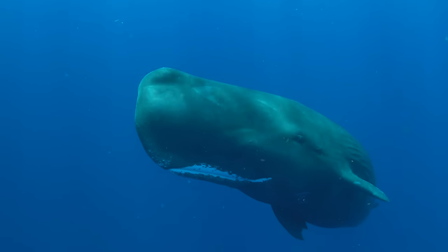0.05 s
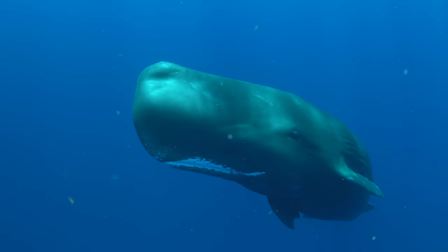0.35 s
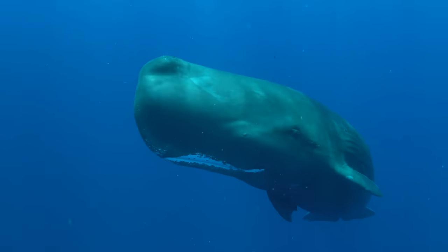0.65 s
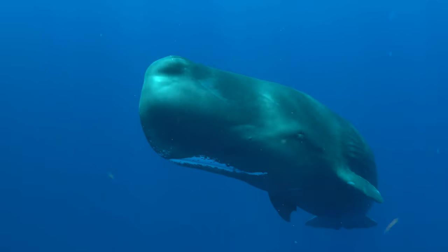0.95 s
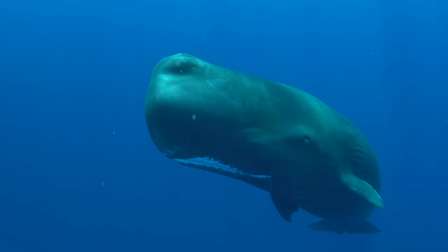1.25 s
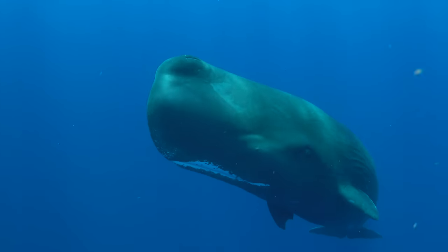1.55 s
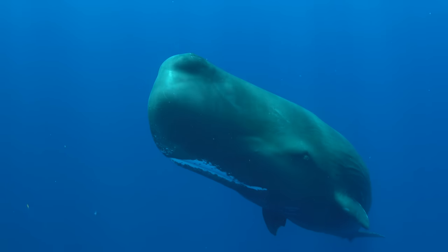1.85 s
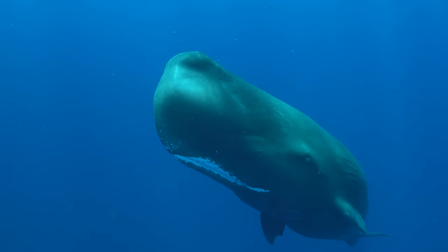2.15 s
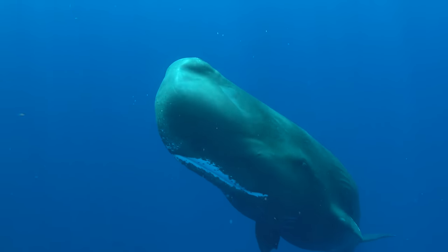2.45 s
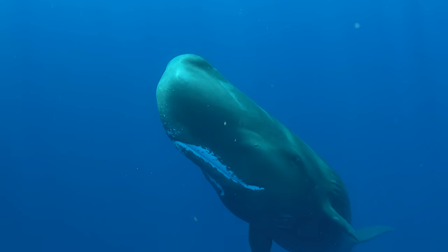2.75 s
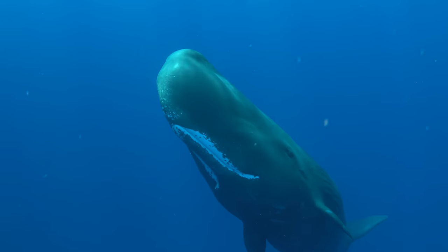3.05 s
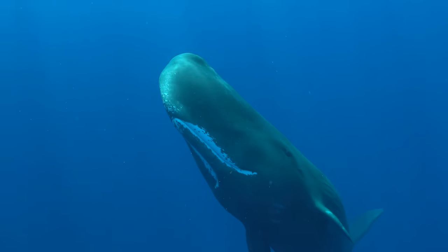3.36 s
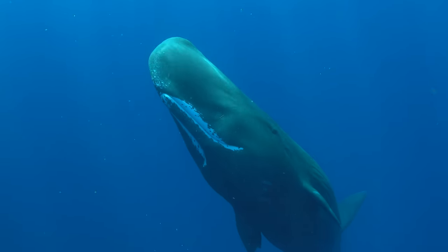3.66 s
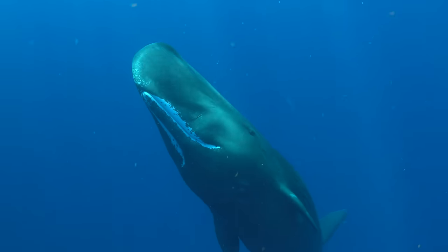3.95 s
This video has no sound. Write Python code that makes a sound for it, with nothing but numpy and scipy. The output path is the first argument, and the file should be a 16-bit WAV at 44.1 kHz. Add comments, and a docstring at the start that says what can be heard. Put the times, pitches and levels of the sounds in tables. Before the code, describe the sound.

A sperm whale clicks close by underwater, the clicks speeding up into a creak.

```python
"""A soft wash of water with a faint crackle, and at once a sperm whale clicking close by:
a loose train, a pause, then clicks that speed up into a creak. Each click is a dull first pulse,
a brighter one from the head just after it, and a low knock that sets the camera housing ringing.
Small pockets of air gurgle, a few hard snaps sound, and near the end something bumps the housing."""
import sys
import numpy as np
from scipy import signal
from scipy.fft import rfft, irfft
from scipy.io import wavfile
from scipy.ndimage import uniform_filter1d, map_coordinates

SR = 44100
rng = np.random.default_rng(int(sys.argv[2]) if len(sys.argv) > 2 else 0)


def put_to_file(sound):
    """Save the sound as 16-bit audio at rate SR, in the file named by the first command-line argument."""
    columns = np.atleast_2d(sound).T  # one column per channel
    safe = np.clip(columns, -1, 1)
    whole_steps = np.round(safe * 32767)
    wavfile.write(sys.argv[1], SR, whole_steps.astype(np.int16))


N = 176400
TIME_S, BINS_HZ = np.arange(N) / SR, np.fft.rfftfreq(N, 1 / SR)
EVENT_N = 4096
AGE_S = np.arange(EVENT_N) / SR


def from_db(db):
    """Decibels to gain."""
    return 10 ** (np.asarray(db) / 20)


def unit_rms(x):
    """Scale to rms 1."""
    return x / np.sqrt(np.mean(x ** 2) + 1e-20)


def at_hz(points, hz):
    """Read a table on a log-frequency axis."""
    points_hz, values = np.transpose(points)
    return np.interp(np.log(hz + 1e-9), np.log(points_hz), values)


def add(out, time_s, sound):
    """Mix a sound in at time_s."""
    start = int(time_s * SR)
    out[:, start:start + len(sound.T)] += sound[..., :max(N - start, 0)]


def pan(db):
    """Gains for a left-minus-right level."""
    return from_db(np.array([[db], [-db]]) / 2)


def colour(white, spectrum):
    """Filter by a spectrum table; rms 1."""
    size = white.shape[-1]
    gain = from_db(at_hz(spectrum, np.fft.rfftfreq(size, 1 / SR)))
    return unit_rms(irfft(rfft(white) * gain, size))


def swell(peak_s, attack_s, decay_s, tail_db, tail_s):
    """Pulse envelope: rise, quick fall, tail; energy of 10 ms at rms 1."""
    after_s = np.maximum(AGE_S - peak_s, 0)
    rise = np.exp(np.minimum(AGE_S - peak_s, 0) / attack_s)
    shape = rise * (np.exp(-after_s / decay_s) + from_db(tail_db) * np.exp(-after_s / tail_s))
    return shape / np.sqrt(np.sum(shape ** 2) / (SR / 100))


def pulse(white, spectrum, envelope):
    """Smeared pulse: noise under an envelope, evened out to the given spectrum."""
    target = from_db(at_hz(spectrum, np.fft.rfftfreq(EVENT_N, 1 / SR)))
    grain = colour(white, spectrum)
    power = uniform_filter1d(np.abs(rfft(grain * envelope)) ** 2, size=25)
    even = envelope * irfft(rfft(grain) * target / np.sqrt(np.abs(power) + 1e-12))
    return unit_rms(even) * np.sqrt(np.mean(envelope ** 2))


def varied(modes, scatter_db, detune=0):
    """The modes as one blow excites them, each a little different."""
    return [(hz * (1 + detune * rng.normal()), db + scatter_db * rng.normal(), t60_s)
            for hz, db, t60_s in modes]


def ring(modes, delay_s, attack_s):
    """Struck modes build up and die away."""
    t = np.maximum(AGE_S - delay_s, 0)
    rings = sum(from_db(db) * np.exp(-np.log(1000) * t / t60_s) * np.sin(2 * np.pi * hz * t)
                for hz, db, t60_s in modes)
    return rings * (1 - np.exp(-t / attack_s))


def burst(t, hz, width_s, rise_per_s=0):
    """A tone under a bell curve centred on t = 0."""
    bell = np.exp(-(t / width_s) ** 2 / 2)
    return bell * np.cos(2 * np.pi * hz * t * (1 + rise_per_s * t / 2))


# Likeness of the two sides in the wash: (frequency [Hz], correlation [-])
WASH_CORRELATION = [(100, 0.78), (350, 0.99), (700, 0.59), (1100, 0.7), (2500, 0.022), (8000, 0.43)]
def stereo_noise(gain):
    """Noise with a gain per frequency, most alike left and right in the lows; rms 1."""
    alike = at_hz(WASH_CORRELATION, BINS_HZ)
    mid, side = rfft(rng.standard_normal((2, N))) * gain
    return unit_rms(irfft(np.sqrt(1 + alike) * mid + np.sqrt(1 - alike) * side * [[1], [-1]], N))


# Wash spectrum: (frequency [Hz], relative density [dB])
WASH_SPECTRUM = [(25, -61), (70, -31), (130, -21.5), (220, -14.5), (330, -8), (520, -8), (660, -7),
                 (830, -7.5), (1200, -8.5), (1500, -14.5), (2400, -14.5), (5500, -18.5), (9000, -19.5),
                 (13000, -21.5), (16000, -27)]
# Housing resonances in the wash: (centre [Hz], half-width [Hz], level [dB])
HUM_BANDS = [(433, 20.5, -68), (1032.5, 34, -60.5), (1127, 17.4, -67)]
def water(wash_db=-60, swell_db=1):
    """A soft wash swells a little and hums in the housing's resonances."""
    wash = from_db(wash_db) * stereo_noise(from_db(at_hz(WASH_SPECTRUM, BINS_HZ)))
    hum = sum(from_db(db) * stereo_noise(1 / (1 + ((BINS_HZ - centre_hz) / width_hz) ** 2))
              for centre_hz, width_hz, db in HUM_BANDS)
    drift = colour(rng.standard_normal(N), [(4, -50), (15, -19.5), (100, -65), (400, -120)])
    return (wash + hum) * from_db(swell_db * drift)


# Crackle filter: (frequency [Hz], relative gain [dB])
CRACKLE_SPECTRUM = [(500, -23), (3000, 9), (7000, -7), (12000, 0), (16000, -8)]
def crackle(level_db=-75, ticks_per_s=120, spread_db=4):
    """Tiny ticks all around in the water, each side hearing its own."""
    sizes = from_db(spread_db * np.minimum(rng.exponential(1, (2, N)), 3))
    signs = rng.choice([-1, 1], (2, N))
    ticks = sizes * signs * (rng.random((2, N)) < ticks_per_s / SR)
    smear = rng.standard_normal((2, EVENT_N)) * np.exp(-AGE_S / 0.00071)
    smeared = signal.fftconvolve(ticks, smear, axes=1)[:, :N]
    return from_db(level_db) * colour(smeared, CRACKLE_SPECTRUM)


# Clicks before the creak: (time [s], relative crack level [dB], relative knock level [dB])
SINGLE_CLICKS = [(.0439, -41.7, -55), (.1023, -41.7, -56), (.17, -41, -57), (.2344, -40, -56),
                 (.2961, -39, -56), (.3595, -40, -57), (.3817, -44.6, -64), (.4231, -40, -55),
                 (.4909, -41, -55), (.5585, -43, -56), (.6201, -40, -55), (.6737, -40, -55),
                 (.7226, -39.4, -53), (.7681, -38.7, -53), (.7926, -41, -64), (.8139, -40, -51),
                 (.873, -38.7, -48.5), (.9479, -39, -47), (1.1049, -42, -45.5), (1.4265, -38, -44),
                 (1.593, -38, -45), (1.7226, -37, -44.4), (1.8574, -35.5, -45), (1.9701, -35, -45.6),
                 (2.0543, -37.4, -46), (2.1351, -36, -46), (2.1971, -37.5, -46), (2.2499, -38, -46.6),
                 (2.3082, -38.6, -47), (2.358, -38.7, -47), (2.4101, -39.6, -47), (2.4579, -39.7, -47),
                 (2.5055, -39, -47), (2.5513, -39, -48), (2.5941, -38.5, -49)]
# Every fourth creak click: (time [s], relative crack level [dB], relative knock level [dB])
CREAK_CLICKS = [(2.6351, -37.3, -49), (2.7929, -41.5, -51), (2.9289, -38, -52.6), (3.051, -38, -53),
                (3.1652, -41.7, -54.4), (3.271, -44, -56), (3.3727, -44.7, -58), (3.4723, -46.7, -57),
                (3.5661, -46, -56), (3.6553, -44.6, -57), (3.7406, -42.6, -58.2), (3.8237, -42.3, -58.4),
                (3.9049, -42.7, -58.2), (3.9858, -42.3, -58)]
def whale_clicks():
    """The single clicks, then the creak speeding up along a smooth curve."""
    steps = 2 + np.arange(4 * len(CREAK_CLICKS) - 3) / 4
    padded = [np.pad(column, 2, "reflect", reflect_type="odd") for column in np.transpose(CREAK_CLICKS)]
    creak = [map_coordinates(column, [steps]) for column in padded]
    return SINGLE_CLICKS + list(zip(*creak))


# Aim of the head: (time [s], bright over dull [dB], bright peak delay [s], top treble [dB], ping [dB])
HEAD_AIM = [(0, -13, 0.0073, -11, 1.5), (.8, -6, .0054, -6, -3.5), (1.1, -3, .005, 1, 2),
            (1.43, 6, 0.0041, -5, 0.5), (2.0, 1, 0.0054, 3.5, -1.5), (2.5, 2, 0.0045, -1.5, -4.5),
            (3.0, 6, 0.0061, 3.5, -10), (3.3, 0.5, 0.0051, -2, 0), (4, 0.5, 0.0071, -3, -6)]
# First pulse: (frequency [Hz], relative level [dB])
DULL_SPECTRUM = [(100, -75), (1500, -9), (2700, -14), (3500, -8.5), (4400, -5.5), (5400, 1), (6250, 2.5),
                 (6650, 0.5), (7800, -8.5), (10000, -11.5), (12000, -23.5), (16000, -49)]
# Second pulse: (frequency [Hz], relative level [dB])
BRIGHT_SPECTRUM = [(100, -58), (1500, -8), (2800, -11.5), (3700, -4), (4400, -5), (5400, -9), (6200, -3),
                   (7200, 9), (8000, -0.5), (9700, 2.5), (10900, -1), (11800, -1.5), (13500, 1),
                   (16000, -14)]
# Metallic ping of the housing: (frequency [Hz], relative level [dB], t60 [s])
PING_MODES = [(5320, -3, 0.031), (5480, -5.5, .035), (4066, -15.5, 0.059)]
def cracks(gain_db=-6, kept_share=0.93, path_share=0.7, side_spill=0.077):
    """Click treble: two pulses, smeared by paths that drift as the whale turns, and the housing's ping."""
    out = np.zeros((2, N))
    paths = rng.standard_normal((2, 2, EVENT_N))  # pulse, side, sample
    dull_shape = swell(peak_s=0.0019, attack_s=0.001, decay_s=0.0026, tail_db=-24.5, tail_s=0.025)
    aim_times_s, *controls = np.transpose(HEAD_AIM)
    for time_s, db, _ in whale_clicks():
        paths = np.sqrt(kept_share) * paths + np.sqrt(1 - kept_share) * rng.standard_normal(paths.shape)
        grain = np.sqrt(path_share) * paths + np.sqrt(1 - path_share) * rng.standard_normal(paths.shape)
        grain = grain + side_spill * grain[:, ::-1]
        aim_db, peak_s, top_db, ping_db = (np.interp(time_s, aim_times_s, c) for c in controls)
        bright_shape = swell(peak_s, attack_s=0.0019, decay_s=0.0006, tail_db=-8, tail_s=0.0057)
        tilted = [(hz, band_db + np.interp(hz, [9000, 15000], [0, top_db]))
                  for hz, band_db in BRIGHT_SPECTRUM]
        dull = pulse(grain[0], DULL_SPECTRUM, dull_shape) * pan(db=-1)
        bright = pulse(grain[1], tilted, bright_shape) * pan(db=-1.7)
        aim = from_db(aim_db)
        pulses = (dull + aim * bright) / np.hypot(1, aim)
        ping = ring(varied(PING_MODES, scatter_db=2.5), delay_s=0.000813, attack_s=0.0027) * pan(db=5)
        add(out, time_s, from_db(db + gain_db) * (pulses + from_db(ping_db) * ping))
    return out


# Wall resonances: (centre [Hz], width [Hz], gain [dB])
WALL_BANDS = [(3690, 300, 5), (4060, 90, 3.5), (4640, 90, -1), (4850, 48, 7.5), (5330, 125, 5),
              (5430, 220, 4.5), (5840, 71, -0.5), (6400, 140, 5.5), (6450, 100, -1.5), (7160, 400, 4),
              (7670, 140, 0), (8390, 74, 4), (8850, 135, 6), (9530, 200, 5), (9720, 180, 4),
              (10260, 230, 6), (11900, 350, 8.5), (13000, 330, -1), (13600, 130, 5.5)]
def housing_wall(x):
    """Sound crosses the wall: each resonance lifts or dips a narrow band and rings briefly."""
    for hz, width_hz, db in WALL_BANDS:
        band = signal.lfilter(*signal.iirpeak(hz, hz / width_hz, fs=SR), x + 1e-18)
        x = x + (from_db(db) - 1) * band
    return x


# Low housing modes: (frequency [Hz], relative level [dB], t60 [s])
BASS_MODES = [(128, 6, 0.03), (243.6, -1, 0.083), (293.6, 7, 0.066)]
# Midrange housing modes: (frequency [Hz], relative level [dB], t60 [s])
MIDRANGE_MODES = [(477.6, -1.5, 0.052), (570, 8.5, 0.019), (900, 2.5, 0.035), (1047, -5.5, 0.2),
                  (1140, 2, 0.035), (1419, -10, 0.053), (1858, -12, 0.065)]
# Knock colour as the whale turns: (time [s], midrange over bass [dB], centre [Hz])
KNOCK_COLOUR = [(0, 2.5, 1070), (1.0, -2, 995), (1.8, 1, 1110), (2.4, 0, 1160), (2.9, 3.5, 1220),
                (3.2, 1.5, 1025), (3.55, 4.5, 954), (4, 8, 995)]
def knocks(knock_db=10.5, scatter_db=1.4, jitter_s=0.00007, bass_cut_hz=202, leak_db=-23.5):
    """Click lows: a short knock rings the housing, so alike each time that fast clicks fuse to a pitch."""
    out, leak = np.zeros((2, 2, N))
    turn_times_s, mid_db, centre_hz = np.transpose(KNOCK_COLOUR)
    knock_age_s = AGE_S - 0.00262 - np.array([[0.000085], [0]])  # right side leads
    for time_s, _, db in whale_clicks():
        bass_modes = varied(BASS_MODES, scatter_db, detune=0.012)
        mid_modes = varied(MIDRANGE_MODES, scatter_db, detune=0.012)
        bass = ring(bass_modes, delay_s=0.0019, attack_s=0.0011)
        middle = ring(mid_modes, delay_s=0.001907, attack_s=0.00067)
        side = 0.1 * ring(mid_modes, delay_s=0.0023, attack_s=0.0035) * [[1], [-1]]
        knock = burst(knock_age_s, np.interp(time_s, turn_times_s, centre_hz), width_s=0.001)
        mid_gain = from_db(np.interp(time_s, turn_times_s, mid_db))
        midrange = mid_gain * (middle + side + from_db(knock_db) * knock)
        add(out, time_s + jitter_s * rng.normal(), from_db(db) * (bass + midrange))
        add(leak, time_s, from_db(db + leak_db + scatter_db * rng.normal()) * bass)
    highpass = signal.butter(3, bass_cut_hz, "high", fs=SR, output="sos")  # housing passes little bass
    return signal.sosfilt(highpass, out) + leak


# Air pockets: (time [s], level [dB], frequency [Hz], width [s])
AIR_POCKETS = [(0.079, -63.5, 139, 0.006), (.665, -51, 1039, 0.008), (1.531, -50, 1027, 0.005),
               (1.759, -52, 388, 0.0073), (1.801, -51.5, 433, 0.01), (2.009, -48.5, 1090, 0.0088),
               (2.014, -55, 415, 0.01), (2.109, -52, 1010, 0.0075), (2.479, -49, 1020, 0.0039),
               (3.21, -66, 160, 0.0081), (3.579, -54, 183, 0.0038), (3.871, -70, 163, 0.013)]
def gurgles():
    """Small pockets of air wobble, rising very slightly in pitch."""
    return sum(from_db(db) * burst(TIME_S - time_s, hz, width_s, rise_per_s=0.69)
               for time_s, db, hz, width_s in AIR_POCKETS)


# Hard snaps: (time [s], relative level [dB], body peak [Hz])
HARD_SNAPS = [(0.5624, -32.5, 5800), (0.7932, -44, 5300), (3.2932, -43.5, 5560), (3.9692, -40.5, 5230)]
def snaps(gain_db=-6, edge_db=-6.5):
    """Hard, sharp snaps, a ringing body under a bright edge; the loudest accents a click of the train."""
    out = np.zeros((2, N))
    body_shape = swell(peak_s=0.00336, attack_s=0.00098, decay_s=0.0033, tail_db=-10, tail_s=0.0046)
    edge_shape = swell(peak_s=0.0018, attack_s=0.00012, decay_s=0.00061, tail_db=-26, tail_s=0.003)
    edge_spectrum = [(2000, -28), (6000, -11), (11000, -13), (14000, -6)]
    for time_s, db, hz in HARD_SNAPS:
        body_spectrum = [(hz / 60, -40), (hz / 6, -14), (hz * 0.16, -22), (hz * 0.5, -18),
                         (hz * 0.75, -5), (hz * 0.87, -7), (hz, 1), (hz * 1.2, -16), (hz * 2.4, -28)]
        body = pulse(rng.standard_normal((2, EVENT_N)), body_spectrum, body_shape)
        edge = pulse(rng.standard_normal((2, EVENT_N)), edge_spectrum, edge_shape)
        add(out, time_s - 0.003, from_db(db + gain_db) * (body + from_db(edge_db) * edge))
    return out


# Contacts of one bump: (time [s], level [dB], frequency [Hz], width [s])
BUMP_TAPS = [(3.6381, -37.5, 750, 0.00058), (3.6561, -24.5, 1054, 0.0018), (3.6695, -38.5, 1100, 0.0043),
             (3.679, -53, 980, 0.003)]
def bump(scuff_db=-11.5):
    """Something taps the housing: hollow bursts with a little scuff."""
    out = np.zeros((2, N))
    scuff_spectrum = [(90, -45), (600, -4), (1500, -2), (2800, -15), (5000, -22), (16000, -31)]
    scuff_shape = swell(peak_s=0.003, attack_s=0.003, decay_s=0.012, tail_db=-5, tail_s=0.01)
    for time_s, db, hz, width_s in BUMP_TAPS:
        out += from_db(db) * burst(TIME_S - time_s, hz, width_s) * pan(db=5)
        scuff = colour(rng.standard_normal((2, EVENT_N)), scuff_spectrum) * scuff_shape
        add(out, time_s - 0.005, from_db(db + scuff_db) * scuff)
    return out


def scene():
    """The whale and the water around the camera."""
    return housing_wall(cracks() + snaps()) + knocks() + bump() + gurgles() + water() + crackle()


def record(dry):
    """Steep low-pass."""
    cutoff_hz = 16400
    return signal.sosfilt(signal.ellip(12, 0.1, 80, cutoff_hz, fs=SR, output="sos"), dry)


dry = scene()
out = record(dry)
put_to_file(out)
```